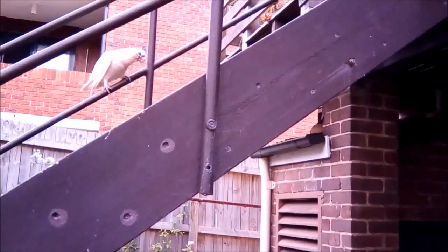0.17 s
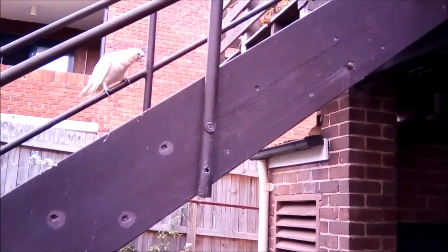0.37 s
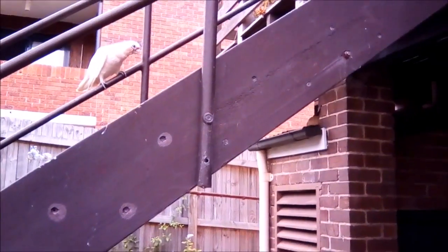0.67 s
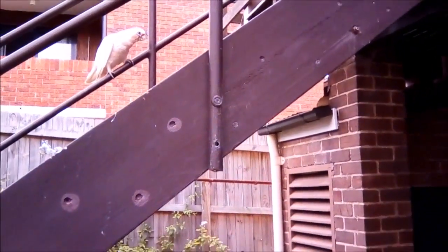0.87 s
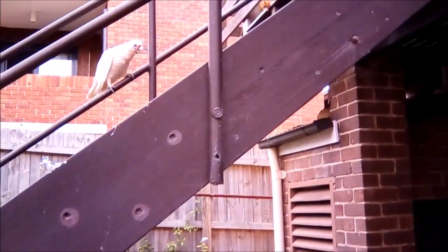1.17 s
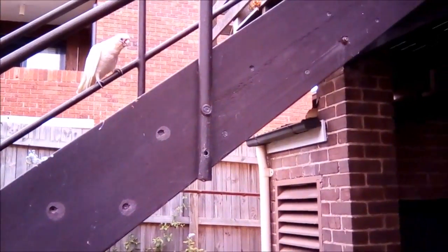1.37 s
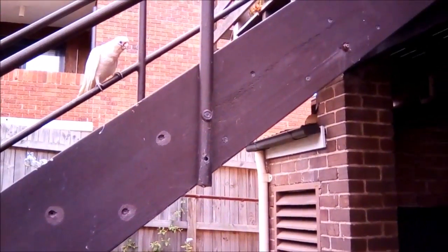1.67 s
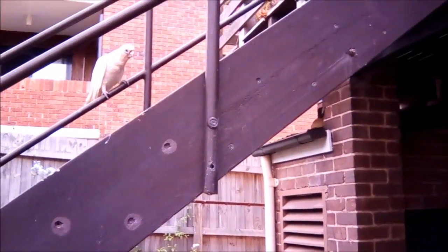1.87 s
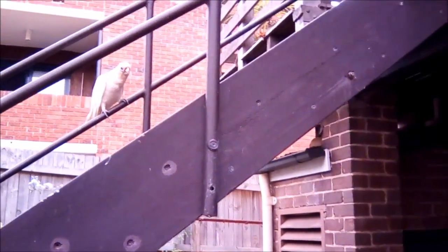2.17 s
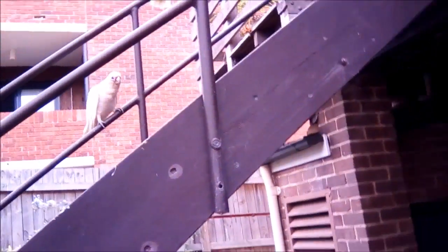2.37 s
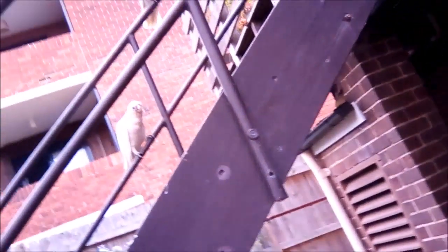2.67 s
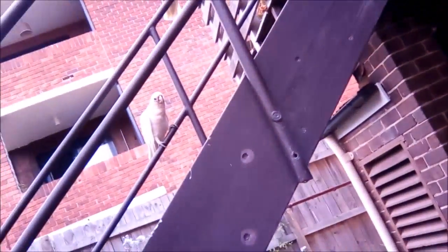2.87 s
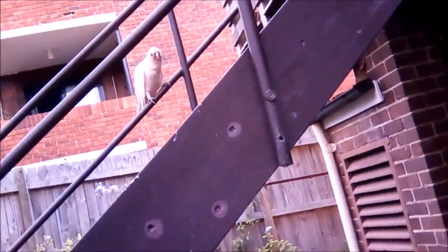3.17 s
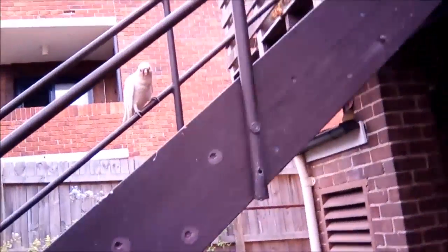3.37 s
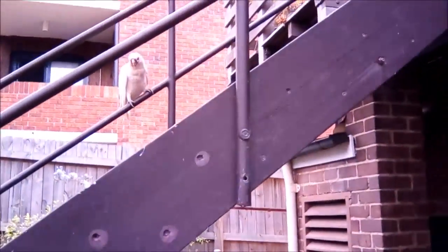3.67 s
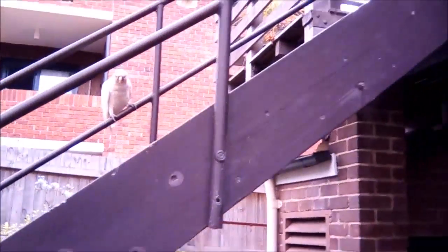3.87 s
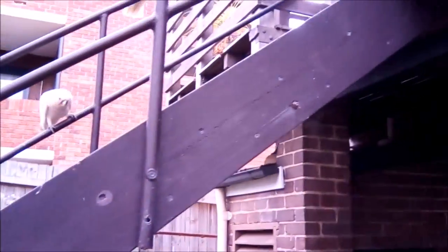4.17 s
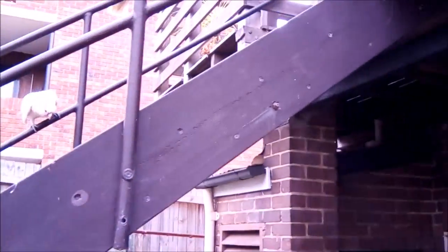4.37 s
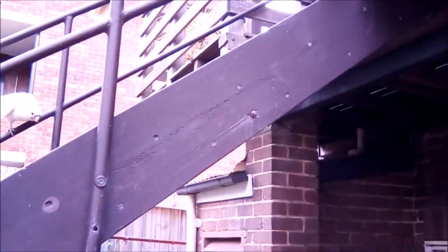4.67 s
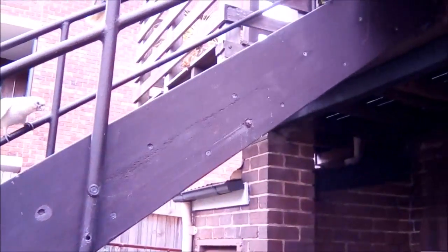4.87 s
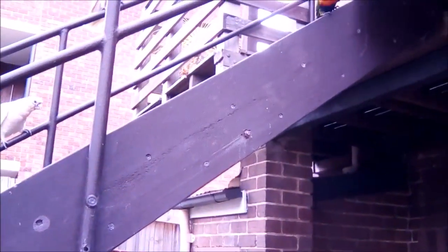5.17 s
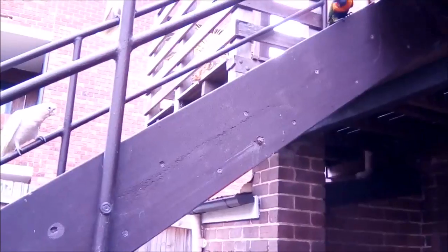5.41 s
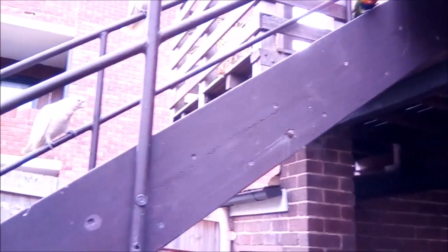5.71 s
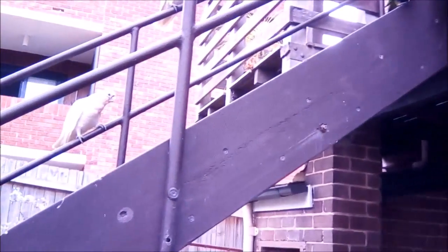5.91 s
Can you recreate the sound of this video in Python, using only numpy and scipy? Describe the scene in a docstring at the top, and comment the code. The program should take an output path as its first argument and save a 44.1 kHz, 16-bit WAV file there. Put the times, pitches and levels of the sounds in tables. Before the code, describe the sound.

After a tiny silence, a weak screech tail and a thin falling whistle lead into a nearby cockatoo's harsh screeching in a brick yard. From 0.27 to 2.3 seconds it repeats short, rasping cries, each about 0.15 seconds, scooping up and torn by fast throbs. A faint chirp comes at 0.5, a scooping whistle at 0.8 and a hollow, yodelling squawk at 1.15. A distant low drone swells near 0.85, then fades. From about 2.4 to 3.7 the cockatoo rests while smaller, more distant parrots chirp and rattle softly. At 3.7 it resumes louder, brighter and more strained, screeching about every 0.35 seconds until 4.9, with a creaky squawk after 4.05. A brief whistle and nasal, flipping yodel follow around 5.0 to 5.3, then two last screeches at 5.5 and 5.85, the first over a cracked squawk. Walls echo every call over faint air and hiss.

```python
"""A brick backyard: on a stair rail close to the microphone a white cockatoo screeches again and again.
Each screech is a rising tone near 1 kHz, torn up by fast throbs that also fire bursts in the beak resonance.
Pulse-driven nasal squawks and near-sine whistles fall in between; further off, smaller parrots chirp
and rattle. The walls answer with echoes and a diffuse tail. Behind it all lie filtered-noise air,
a thin high hiss and a distant low drone that swells and fades."""
import sys
import numpy as np
from scipy import signal
from scipy.fft import rfft, irfft, next_fast_len
from scipy.io import wavfile
from scipy.ndimage import uniform_filter1d, minimum_filter1d, map_coordinates

SR = 44100
rng = np.random.default_rng(int(sys.argv[2]) if len(sys.argv) > 2 else 0)


def waveform_to_disk(signal):
    """Save audio, clipped to [-1, 1], as 16-bit WAV at the path in sys.argv[1]."""
    frames = np.transpose(np.atleast_2d(signal))
    scaled = np.clip(frames, -1, 1) * 32767
    samples = np.round(scaled).astype(np.int16)
    wavfile.write(sys.argv[1], SR, samples)


N = 266540
TIME = np.arange(N) / SR
CUTOFF_HZ, START_S = 15600, .09

# Call levels are those before the near and far sounds are mixed.
# Outdoor air: freq_hz, level_db
AIR_SPECTRUM = [(25, -19), (50, -5.5), (100, 0), (250, -2.5), (400, -3), (700, -3), (2000, 0), (5000, -2.5),
                (8000, -20.5), (14000, -21.5)]
# The distant drone swells, then fades to a faint rest
DRONE_DB, DRONE_REST_DB, DRONE_PEAK_S, DRONE_SPREAD_S = -60.5, -79, 0.85, 0.63

# How long the yard rings: freq_hz, t60_s
YARD_T60 = [(500, 0.67), (1000, 0.47), (2000, 0.57), (4000, 0.41), (7000, 0.46), (14000, 0.15)]
# Wall echoes: delay_s, gain_db
WALL_ECHOES = [(.0093, -4.5), (.021, -7.5), (0.042, -6.5)]
# What the walls send back: freq_hz, gain_db
YARD_COLOUR = [(600, -2.5), (2000, -1.5), (4100, 5), (5200, 1.5), (6000, 1.5), (9000, -2.5)]

# Small parrots' chirps, a pip that then dives: start_s, pip_s, dive_s, pitch_hz, level_db
CHIRPS = [ (0.535, 0.018, 0.041, 2390, -47.5), (2.377, 0.0034, 0.029, 2360, -50.5),
          (2.531, 0.00405, .04, 2985, -52), (2.572, 0.02, 0.0038, 2263, -46.5),
          (2.711, .01, .03, 3110, -42), (2.745, 0.031, 0.0026, 2145, -44), (2.789, 0.044, .025, 2448, -47),
          (3.123, 0.013, 0.04, 3234, -44), (3.241, 0.023, 0.034, 2420, -49),
          (3.555, 0.011, 0.034, 3210, -43.5), (3.666, 0.025, 0.042, 2300, -53)]
CHIRP_SAG_OCT_PER_S, DIVE_OCT_PER_S, DIVE_FADE_DB_PER_S = 1.91, 28, 167
PIP_ROUGH, DIVE_ROUGH = 0.26, 0.69  # 0-1
# High pips have a strong overtone: pitch_hz, overtone_db
CHIRP_OVERTONE = [(2400, -21), (3050, 4)]
# Small parrots' rattles, runs of harsh falling snaps: start_s, length_s, level_db
RATTLES = [(2.675, .01, -38.5), (2.924, .112, -45.5), (3.355, 0.1, -46)]
SNAP_EVERY_S, SNAP_S, SNAP_FROM_HZ, SNAP_TO_HZ = .025, 0.029, 3600, 1700
SNAP_ROUGH, SNAP_FADE_DB, SNAP_OVERTONE_DB = 0.58, 18.5, 1
FIRST_SNAP_DB = -9  # the opening snap is softer than the rest
# Throat colour of the small parrots: freq_hz, gain_db
PARROT_THROAT = [(500, -36), (1400, 2), (2200, 2), (3100, 0.5), (4200, -7.5), (5300, -3), (6150, -4),
                 (7000, -13.5), (8000, -35), (12000, -34)]

# Thin whistles: start_s, length_s, pitch_hz, sag_oct_per_s, scoop (0-1 of pitch), level_db
WHISTLES = [(0.147, 0.14, 1793, 2.5, 0, -47), (0.821, .175, 2256, 1.9, .33, -38.5),
            (4.978, .09, 1810, 3.9, 0.06, -43.5)]
WHISTLE_SCOOP_S, WHISTLE_SWELL_S, WHISTLE_SWELL_DB = 0.029, 0.058, 6.5

# Throat colours of the hollow and the nasal squawk: freq_hz, gain_db
HOLLOW_THROAT = [(200, -72), (450, 5), (700, -9), (1400, -2.5), (2100, 1.5), (2800, -3.5), (3600, -22),
                 (4800, -7), (6300, -11.5), (7500, -40), (13000, -57)]
NASAL_THROAT = [(200, -79), (450, 0.5), (780, -11.5), (1050, 14), (1350, 1), (1650, 4.5), (2200, 2.5),
                (2800, 6), (3700, -0.5), (5500, 1), (6700, -0.5), (7800, -24), (13000, -41.5)]
# Below a steady pitch the voice turns rough and weak, fully so at the creak pitch
STEADY_HZ, CREAK_HZ, CREAK_ROUGH, CREAK_LOSS_DB = 693, 500, 0.4, 8.5
# Short squawks that crack into a creak: start_s, clear_s, creak_s, level_db, nasality (0-1)
CRACKS = [(4.045, .045, .12, -31.5, 0.89), (5.506, 0.038, .11, -35, 0)]
CLEAR_HZ, CRACKED_HZ, CREAK_END_HZ, CRACK_S = 756, 544, 463, 0.016
CRACK_SWELL_DB, CREAK_FADE_DB = 8.5, 12
# Pitch curves of the two long yodelling squawks, one list each: time_s, pitch_hz
YODEL_PITCH = [
    [(1.145, 754.9), (1.167, 705), (1.191, 794), (1.217, 705.5), (1.243, 696.4), (1.283, 686.5),
     (1.297, 738), (1.317, 723.1), (1.335, 667), (1.371, 675.8), (1.42, 670.5)],
    [(5.075, 663.6), (5.115, 743), (5.151, 657), (5.175, 716), (5.195, 845.3), (5.219, 819.7), (5.245, 579),
     (5.269, 551), (5.285, 728), (5.295, 767), (5.325, 740)],
]
# The same two squawks: loudest_after_s, level_db, pitch_gain_db_per_octave, rough (0-1), nasality (0-1)
YODELS = [(0.16, -24, -4, 0.07, 0.21), (0.1, -22, 6.5, 0.12, 0.86)]
# A yodel eases in and out, and sinks on either side of its loudest moment
YODEL_EDGE_S, YODEL_EDGE_DB, YODEL_SLOPE_DB_PER_S = 0.056, -13.5, 41

# Screeches: start_s, length_s, swell_s, level_db, strain (0-1), tuning (throat ratio), treble_db
SCREECHES = [ (0.028, 0.18, .012, -43, 0.5, 1, 0.5), (0.266, 0.16, 0.058, -21, 0.21, 1.0, 2.5),
             (0.612, .15, 0.042, -21.5, 0.01, 0.98, -1), (0.983, .162, 0.04, -22, 0, 0.96, 1.5),
             (1.286, .175, 0.044, -22.5, 0.04, 0.99, 0), (1.483, 0.098, 0.044, -27, 0.1, 1.02, 0),
             (1.624, .16, .035, -22, 0.06, 1.034, -0.5), (1.886, 0.16, 0.044, -21.5, 0.21, 1, 0),
             (2.138, .16, 0.047, -21, 0.19, 1.025, 1.5), (3.713, 0.14, 0.044, -17, 0.31, 1.026, 2.5),
             (4.048, 0.15, 0.05, -17, 0.6, 1.008, 5), (4.404, 0.16, 0.041, -17.5, 0.6, 1.023, 0.5),
             (4.786, .155, .03, -18.5, 0.54, 1.013, -1), (5.541, 0.15, 0.042, -18, 0.5, 1.012, 0.5),
             (5.848, 0.16, 0.027, -19, 0.56, 1.034, -2)]
# Throat colours of the easy and the strained screech before opening and tuning: freq_hz, gain_db
EASY_THROAT = [(600, -39.5), (1060, -17), (1600, -15), (2100, -20), (2550, 0), (3500, -11.5), (4100, 3),
               (4550, -10), (5300, 2.5), (6500, -1.5), (7600, -17), (9400, -24.5), (11000, -33),
               (13000, -54)]
STRAINED_THROAT = [(600, -28.5), (1060, -25.5), (1650, -30), (2300, -23.5), (2700, -13), (3400, -19),
                   (4050, 2), (4650, -5.5), (5450, -1), (6100, -13), (6900, -8), (7600, -48), (8400, -25.5),
                   (10800, -38), (13000, -49)]
# Strain makes the note less rough and lifts the beak resonance
EASY_ROUGH, STRAINED_ROUGH = 0.83, 0.476
EASY_BEAK_HZ, STRAINED_BEAK_HZ = 5146, 5764
TOP_HZ = 1045  # every screech scoops up towards this pitch
# Extra level of a screech's first bursts: after_start_s, gain_db
FIRST_BURSTS = [(.016, -6), (.024, 8), (.055, 4), (.085, 4.5)]


def from_db(db):
    """Decibels to gain."""
    return 10 ** (np.asarray(db) / 20)


def rms_one(x):
    """Scale to unit rms."""
    return x / np.sqrt(np.mean(x ** 2) + 1e-20)


def at_hz(points, hz):
    """Read a curve on a log-frequency axis."""
    freq, value = np.transpose(points)
    return np.interp(np.log(np.maximum(hz, 1)), np.log(freq), value)


def colour(x, spectrum):
    """Filter by a smooth spectrum."""
    size = next_fast_len(len(x) + 2048)
    gain = from_db(at_hz(spectrum, np.fft.rfftfreq(size, 1 / SR)))
    return irfft(rfft(x, size) * gain, size)[:len(x)]


def high_pass(x, hz):
    """Fourth-order cut below a frequency."""
    return signal.sosfilt(signal.butter(4, hz, "high", fs=SR, output="sos"), x)


def resonance(x, hz, width_hz):
    """Two-pole resonance with a gain of about 1 on top."""
    r = np.exp(-np.pi * width_hz / SR)
    poles = [1, -2 * r * np.cos(2 * np.pi * hz / SR), r * r]
    return signal.lfilter([(1 - r * r) / 2, 0, (r * r - 1) / 2], poles, x)


def wobble(size, rate_hz):
    """Smooth random drift of unit rms."""
    r = np.exp(-2 * np.pi * rate_hz / SR)
    drift = signal.lfilter([1], [1, -2 * r, r * r], rng.standard_normal(SR))
    return rms_one(drift[-size:])


def hiss(size):
    """White noise for one call."""
    return rng.standard_normal(SR)[:size]


def fade(t, edge_s):
    """Soft start and end of a call."""
    return np.sin(np.pi / 2 * np.clip(np.minimum(t - t[0], t[-1] - t) / edge_s, 0, 1))


def even(x, size=900):
    """Hold the level near 1 over a few hundredths of a second."""
    return x / np.sqrt(np.abs(uniform_filter1d(x * x, size)) + 1e-12)


def follow(rows):
    """Times and columns of one call's curve, sample by sample."""
    s, *columns = np.transpose(rows)
    t = np.arange(s[0], s[-1], 1 / SR)
    return [t] + [np.interp(t, s, c) for c in columns]


def add(out, start, x):
    """Mix a call in at its time."""
    i = max(int(start * SR), 0)
    out[i:i + len(x)] += x[:max(N - i, 0)]


def background():
    """Outdoor air, a distant low drone and a thin high hiss: noise through broad or narrow filters."""
    air = rms_one(colour(rng.standard_normal(N), AIR_SPECTRUM))
    drone = rms_one(resonance(resonance(rng.standard_normal(N), 137, 35), 112, 35))
    top = rms_one(resonance(resonance(rng.standard_normal(N), 15100, 1300), 15100, 1300))
    swell = np.exp(-((TIME - DRONE_PEAK_S) / DRONE_SPREAD_S) ** 2)
    drone_gain = from_db(DRONE_DB) * swell + from_db(DRONE_REST_DB)
    return from_db(-57) * air + drone_gain * drone + from_db(-70.5) * top


def yard(x, gap_s=0.0037):
    """A few wall echoes and a diffuse noise tail whose decay time depends on frequency."""
    t = np.arange(SR) / SR
    edges_hz = np.geomspace(200, 16000, 9)
    white = rng.standard_normal((2, SR))
    tail = 0
    for k, (low, high) in enumerate(zip(edges_hz, edges_hz[1:])):
        band_pass = signal.butter(2, [low, high], "band", fs=SR, output="sos")
        band = signal.sosfilt(band_pass, white[k % 2])
        tail = tail + band * from_db(-60 * t / at_hz(YARD_T60, np.sqrt(low * high)))
    # the diffuse part carries unit energy before the echoes are added
    response = rms_one(tail * np.clip(t / gap_s, 0, 1)) / np.sqrt(SR)
    for delay, db in WALL_ECHOES:
        response[int(delay * SR)] += from_db(db)
    return signal.fftconvolve(x, response)[:N]


def whistle(pitch, overtone_db, jitter):
    """A sine on a jittering pitch with two overtones."""
    phase = 2 * np.pi * np.cumsum(pitch * (1 + jitter * wobble(len(pitch), 410))) / SR
    second = from_db(overtone_db) * np.sin(2 * phase)
    third = from_db(2 * overtone_db - 1.0) * np.sin(3 * phase)
    return rms_one(np.sin(phase) + second + third)


def parrot_note(t, pitch, overtone_db, rough, jitter=0.0804, rasp=1.0):
    """A small parrot's whistle, blurred by pitch jitter and noise as it gets rougher."""
    tone = whistle(pitch, overtone_db, jitter * rough)
    return (tone + rasp * rough * hiss(len(t))) * fade(t, 0.0014)


def rattles():
    """Quick runs of far-off snaps, each falling about an octave as it dies."""
    out = np.zeros(N)
    t = np.arange(int(SNAP_S * SR)) / SR
    pitch = np.geomspace(SNAP_FROM_HZ, SNAP_TO_HZ, len(t))
    for start, length, db in RATTLES:
        for s in np.arange(start, start + length, SNAP_EVERY_S):
            level_db = db + FIRST_SNAP_DB * (s == start) + SNAP_FADE_DB * (.5 - t / SNAP_S)
            add(out, s, parrot_note(t, pitch, SNAP_OVERTONE_DB, SNAP_ROUGH) * from_db(level_db))
    return out


def chirps():
    """Far-off chirps that sag slightly in pitch, then dive, growing rougher and fainter."""
    out = np.zeros(N)
    for start, pip, dive, hz, db in CHIRPS:
        t = np.arange(int((pip + dive) * SR)) / SR
        diving = np.maximum(t - pip, 0)
        pitch = hz * 2 ** (-CHIRP_SAG_OCT_PER_S * t - DIVE_OCT_PER_S * diving)
        rough = np.where(t < pip, PIP_ROUGH, DIVE_ROUGH)
        note = parrot_note(t, pitch, at_hz(CHIRP_OVERTONE, pitch), rough)
        add(out, start, note * from_db(db - DIVE_FADE_DB_PER_S * diving))
    return out


def whistles():
    """Thin close whines between screeches: near sines that swell, may scoop up, and sag."""
    out = np.zeros(N)
    for start, length, hz, sag, scoop, db in WHISTLES:
        t = np.arange(int(length * SR)) / SR
        pitch = hz * 2 ** (-sag * t) * (1 - scoop * np.exp(-t / WHISTLE_SCOOP_S))
        tone = whistle(pitch, overtone_db=-7, jitter=.028)
        flutter = from_db(2.5 * wobble(len(t), 120))
        level_db = db - WHISTLE_SWELL_DB * np.clip(1 - t / WHISTLE_SWELL_S, 0, 1)
        add(out, start, tone * flutter * from_db(level_db) * fade(t, .008))
    return out


def reed(pitch, count=18):
    """Pulses of the syrinx: equal harmonics on a moving pitch."""
    phase = 2 * np.pi * np.cumsum(pitch) / SR
    harmonics = (np.cos(k * phase) * (k * pitch < CUTOFF_HZ) for k in range(1, count + 1))
    return rms_one(sum(harmonics))


def throat(source, first, second, share):
    """Colour a source by a blend of two throat shapes, at a steady level."""
    share = np.clip(share, 0, 1)
    first_voice = rms_one(colour(source, first))
    second_voice = rms_one(colour(source, second))
    return even((1 - share) * first_voice + share * second_voice)


def squawk(t, pitch, db, rough, nasality, rasp=0.36, hoarse=0.83, hoarse_hz=3400):
    """A lower call: syrinx pulses with hoarse noise on top, creaky where the pitch sinks."""
    creak = np.interp(pitch, [CREAK_HZ, STEADY_HZ], [1, 0])
    rough = rough + CREAK_ROUGH * creak
    jitter = .05 * rough * wobble(len(t), 380)
    rustle = high_pass(hiss(len(t)), hoarse_hz)
    tone = colour(reed(pitch * (1 + jitter)), [(3000, -0.2), (4500, -1.6)])
    source = tone + rasp * rough * hiss(len(t)) + hoarse * np.sqrt(np.abs(nasality)) * rustle
    # rough stretches also shake in level
    shake = from_db(8.3 * rough * wobble(len(t), 60))
    voice = throat(source, HOLLOW_THROAT, NASAL_THROAT, nasality)
    return voice * from_db(db - CREAK_LOSS_DB * creak) * shake * fade(t, 0.0056)


def cracks(rough=0.17):
    """A clear note swells until it cracks, then creaks on downwards."""
    out = np.zeros(N)
    for start, clear, creak, db, nasality in CRACKS:
        end = clear + creak
        t = np.arange(int(end * SR)) / SR
        pitch = np.interp(t, [clear, clear + CRACK_S, end], [CLEAR_HZ, CRACKED_HZ, CREAK_END_HZ])
        level_db = db - np.interp(t, [0, clear, end], [CRACK_SWELL_DB, 0, CREAK_FADE_DB])
        add(out, start, squawk(t, pitch, level_db, rough, nasality))
    return out


def yodels():
    """Long squawks whose pitch flips up and down under one swell of level."""
    out = np.zeros(N)
    for rows, (loudest, db, db_per_octave, rough, nasality) in zip(YODEL_PITCH, YODELS):
        t, pitch = follow(rows)
        edges_db = YODEL_EDGE_DB * (1 - fade(t, YODEL_EDGE_S))
        swell_db = edges_db - YODEL_SLOPE_DB_PER_S * np.abs(t - t[0] - loudest)
        level_db = db + swell_db + db_per_octave * np.log2(pitch / STEADY_HZ)
        add(out, t[0], squawk(t, pitch, level_db, rough, nasality))
    return out


def throbs(t, length, first_hz=62, last_hz=125, uneven=0.358, lead_s=0.0012):
    """Pressure pulses, 0-1: slow and regular at first, then quick and uneven."""
    disorder = np.clip((t - .03) / 0.053, .1, 1)
    steady_rate = np.interp(t, [.04, length], [first_hz, last_hz])
    rate = steady_rate * np.exp(uneven * disorder * wobble(len(t), 78.0))
    return np.sin(np.pi * (np.cumsum(rate) / SR + lead_s * first_hz)) ** 4


def syrinx(t, throb, top_hz, rough, scoop=.38, scoop_s=.034, throb_bend=0.097, jitter=0.0468):
    """Pitch that scoops up, is bent by each throb and jitters fast."""
    pitch = top_hz * (1 - scoop * np.exp(-t / scoop_s))
    bend = throb_bend * (throb - throb.mean())
    return pitch * (1 + rough * (bend + jitter * wobble(len(t), 522)))


def beak_gape(t, length, rough, gape_range=.22, gape_s=.036):
    """The beak opens, trembles, and closes a little at the end; a ratio that moves the resonances."""
    tremble = .022 * wobble(len(t), 60)
    closing = 0.0783 * np.clip((t - length + 0.01326) / 0.0258, 0, 1)
    return 1 - gape_range * np.exp(-t / gape_s) - closing + rough * tremble


def beak_bursts(t, throb, gape, beak_hz, burst_sweep=1.2):
    """Every throb fires a burst of uneven level in the beak resonance, which follows the gape."""
    flutter = 0.054 * (throb - .8) + 0.0301 * wobble(len(t), 537)
    burst_hz = beak_hz * (1 - burst_sweep * (1 - gape)) * (1 + flutter)
    uneven = from_db(6 * np.tanh(wobble(len(t), 52)))
    return throb * uneven * np.sin(2 * np.pi * np.cumsum(burst_hz) / SR)


def screech(length, swell, top_hz, rough, strain, beak_hz, tuning, treble_db, rasp=1.0,
            throb_depth=0.91, beak_db=6.5, onset_db=-17, release_s=.013, burst_fall_db=6, muffled_s=0.046):
    """A rasping note through the opening throat, throbbing in level, with bursts in the beak."""
    t = np.arange(int((length + 3 * release_s) * SR)) / SR
    size = len(t)
    throb = throbs(t, length)
    pitch = syrinx(t, throb, top_hz, rough)
    gape = beak_gape(t, length, rough)
    # reading the voice at a varying speed moves its resonances; the pitch is divided first to stay put
    speed = gape * tuning
    opened = np.cumsum(speed)
    source = reed(np.interp(np.arange(size), opened, pitch / speed)) + rasp * rough * hiss(size)
    voice = map_coordinates(throat(source, EASY_THROAT, STRAINED_THROAT, strain), [opened], order=3)
    # while the beak is half shut the low harmonics stand out
    shut = np.clip(1 - t / muffled_s, 0, 1)
    muffled = colour(voice, [(800, 11), (2400, 8), (3400, 5), (4500, -4), (6500, 1)])
    bright = colour(voice, [(5800, 0.0049), (7200, treble_db)])
    voice = shut * muffled + (1 - shut) * bright
    voice = voice * (1 + throb_depth * (throb - throb.mean()))
    # the first bursts stand out, later ones sink towards the rasp
    first_bursts_db = np.interp(t, *np.transpose(FIRST_BURSTS))
    burst_db = beak_db + first_bursts_db - burst_fall_db * t / length
    voice = voice + from_db(burst_db) * (.5 + .5 * strain) * beak_bursts(t, throb, gape, beak_hz)
    onset = onset_db * np.clip(1 - t / swell, 0, 1)
    level_db = onset - 0.97 * np.clip(1 - t / (0.94 * length), 0, 1)
    release = np.exp(-np.maximum(t - length + 0.011, 0) / release_s)
    return rms_one(voice) * from_db(level_db) * release * fade(t, 0.01)


def screeches():
    """The cockatoo's whole run of screeches, high-passed below the voice."""
    out = np.zeros(N)
    for start, length, swell, db, strain, tuning, treble_db in SCREECHES:
        rough = np.interp(strain, [0, 1], [EASY_ROUGH, STRAINED_ROUGH])
        beak_hz = tuning * np.interp(strain, [0, 1], [EASY_BEAK_HZ, STRAINED_BEAK_HZ])
        call = screech(length, swell, TOP_HZ, rough, strain, beak_hz, tuning, treble_db)
        add(out, start, from_db(db) * call)
    return high_pass(out, 620)


def scene():
    """The cockatoo is near; the small parrots are further off, with more of the walls in their sound."""
    near = screeches() + yodels() + cracks() + whistles()
    far = colour(chirps() + rattles(), PARROT_THROAT)
    walls = colour(yard(from_db(-5.5) * near + from_db(-2.5) * far), YARD_COLOUR)
    return (from_db(-1.0) * near + far + walls + background())[None]


def record(dry):
    """At the microphone a fast limiter holds the peaks, the top is cut, and a short silence leads in."""
    room_left = np.minimum(1, .64 / (np.abs(dry) + 1e-9))
    gain = uniform_filter1d(minimum_filter1d(room_left, size=131), size=131)
    edges = np.clip(np.minimum(TIME - START_S, TIME[-1] - TIME) / .004, 0, 1)
    top_cut = signal.ellip(10, .1, 80, CUTOFF_HZ, fs=SR, output="sos")
    return signal.sosfilt(top_cut, dry * gain * edges)


dry = scene()
out = record(dry)
waveform_to_disk(out)
```